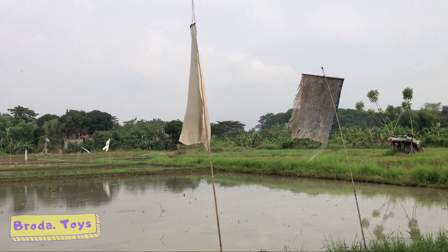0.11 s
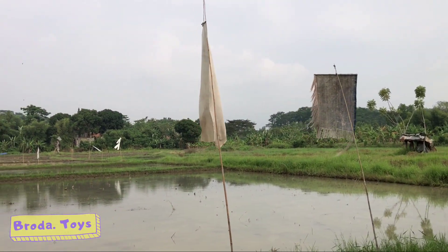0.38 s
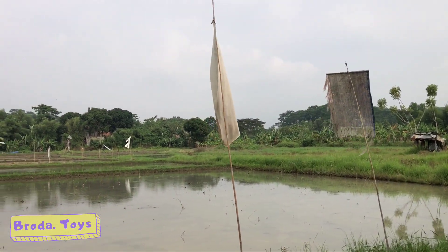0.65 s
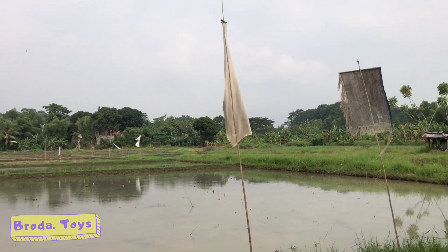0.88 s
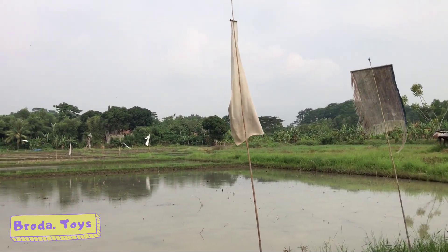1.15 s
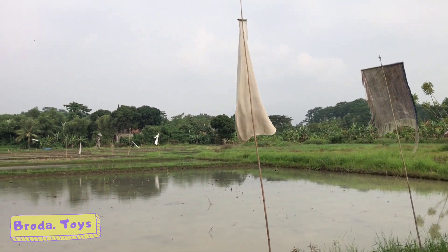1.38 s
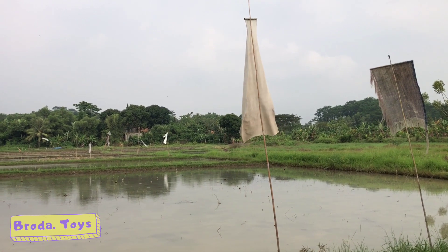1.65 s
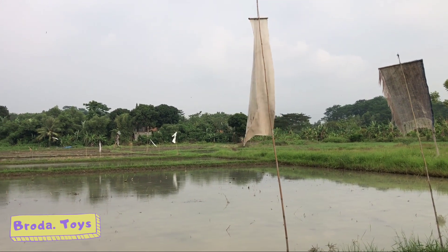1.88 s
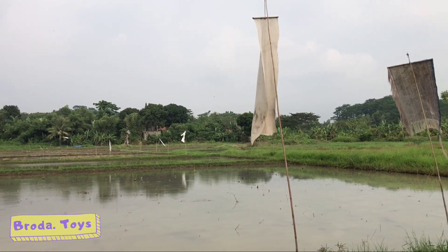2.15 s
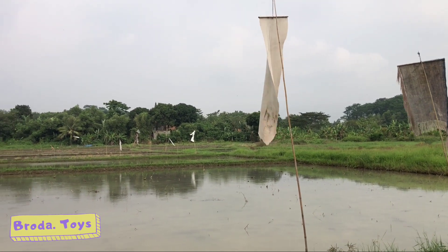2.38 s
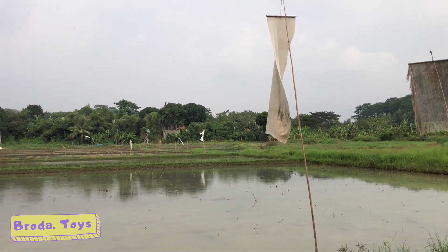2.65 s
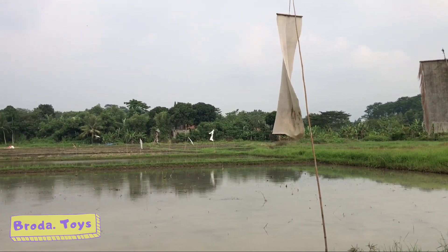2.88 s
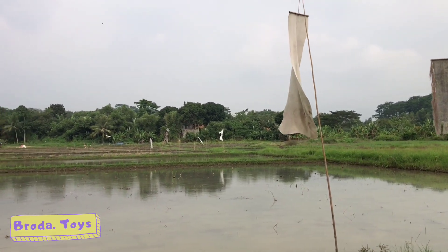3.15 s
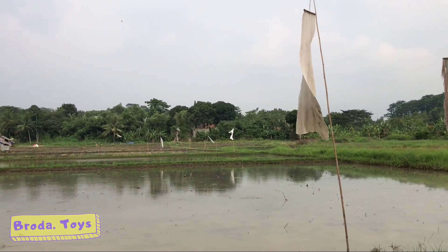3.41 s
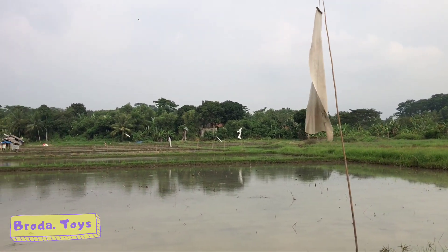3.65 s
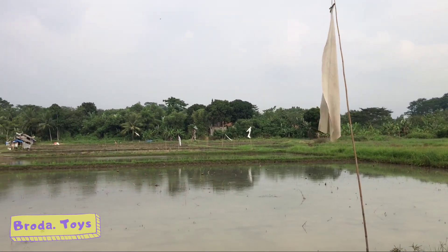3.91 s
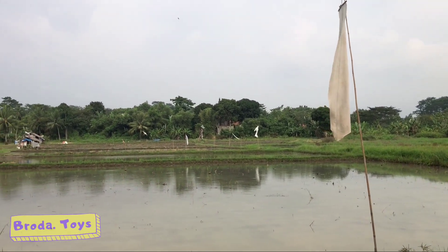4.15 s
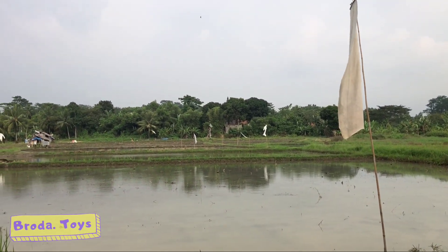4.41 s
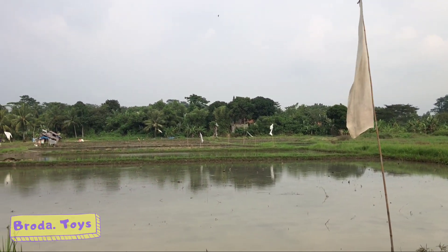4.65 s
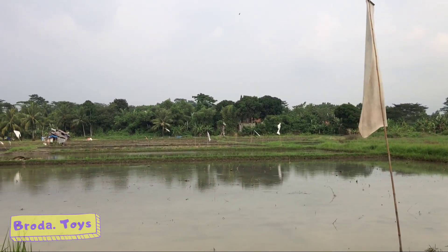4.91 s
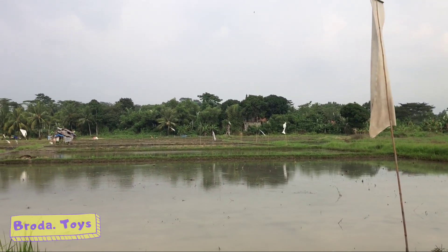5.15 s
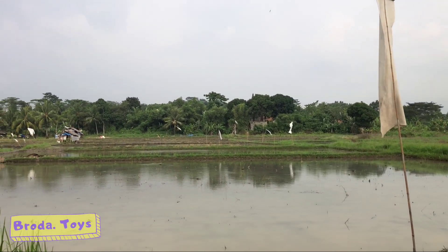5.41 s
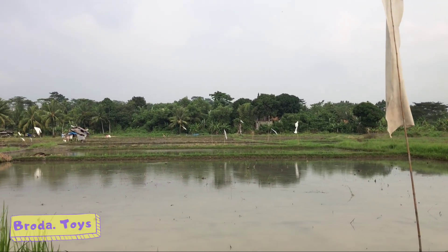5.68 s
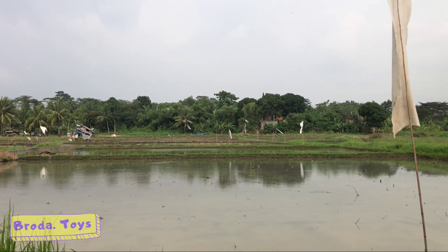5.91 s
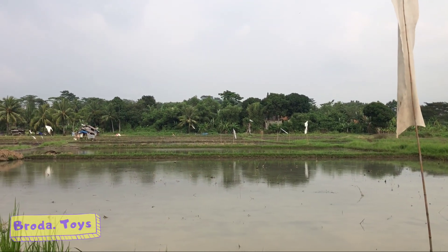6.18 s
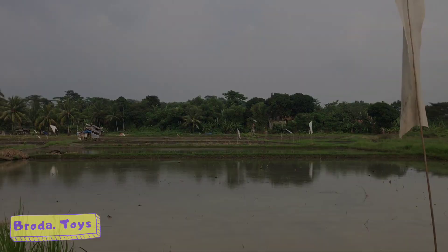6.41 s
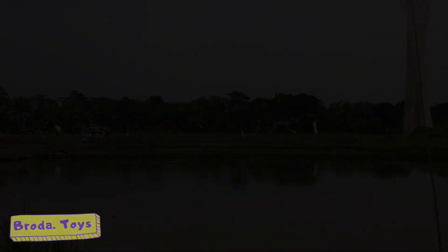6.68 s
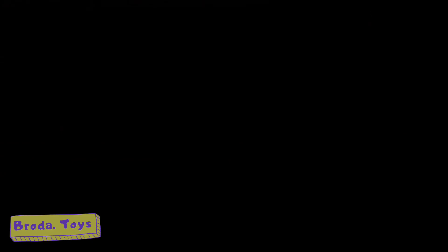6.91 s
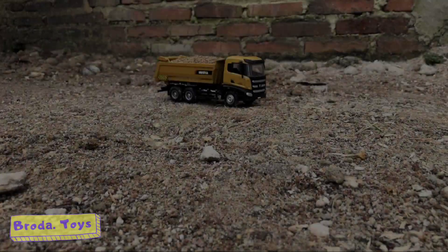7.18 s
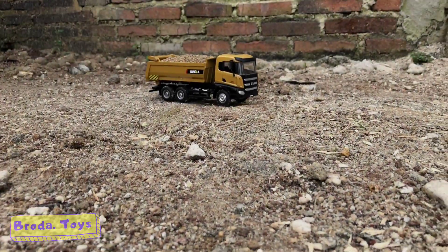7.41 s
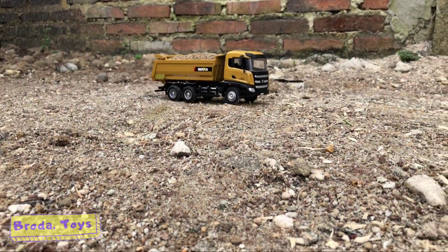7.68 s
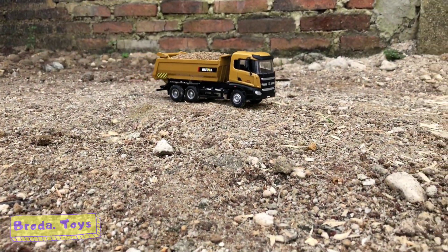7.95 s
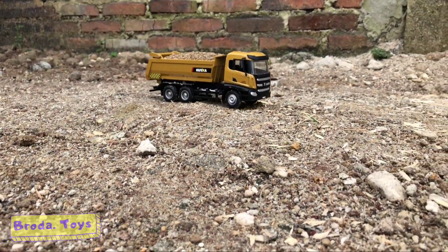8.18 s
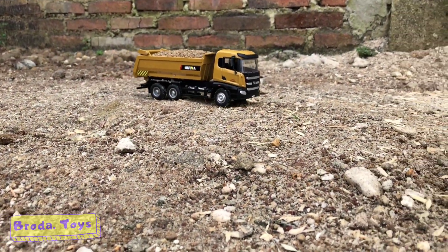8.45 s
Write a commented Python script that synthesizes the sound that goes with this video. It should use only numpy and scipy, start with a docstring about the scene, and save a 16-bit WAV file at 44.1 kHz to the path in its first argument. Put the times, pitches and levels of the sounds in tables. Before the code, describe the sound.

Songbirds whistle and chirp across open countryside for seven seconds, then abruptly a diesel truck's starter clunks, whines and grinds into a low idle.

```python
"""Songbirds whistle, trill and chirp near and far among trees over a faint hiss of open country: each note is a
gliding sine with an unsteady level, and the echoes are decaying noise convolved with the song. After seven
seconds the scene cuts to a diesel truck in the centre: the starter clunks in and whines, and its gears grind
and clank, all made from gear-tooth harmonics and resonated noise. The cylinders catch with deep thuds, pulses
ringing resonances, and then a darker idle of regular firings takes over abruptly, with one belt chirp."""
import sys
import numpy as np
from scipy import signal
from scipy.fft import rfft, irfft, next_fast_len
from scipy.io import wavfile
from scipy.ndimage import uniform_filter1d

SR = 44100
rng = np.random.default_rng(int(sys.argv[2]) if len(sys.argv) > 2 else 0)


def dump(signal):
    """Clip the signal to [-1, 1] and save it as 16-bit WAV at the path in sys.argv[1]."""
    limited = np.clip(np.atleast_2d(signal).T, -1, 1)
    pcm = np.round(limited * 32767).astype(np.int16)
    wavfile.write(sys.argv[1], SR, pcm)


def gain_from_db(level_db):
    """Turn a decibel level (scalar or array-like) into a linear amplitude factor."""
    decades = np.asarray(level_db, float) / 20
    return 10 ** decades


N = 377496
T = np.arange(N) / SR  # time in seconds
SLOW, QUICK = 120, 48  # smoothing of a note's level wobble, samples
SIDE_DB, SIDE_LAG_MS = 4, .43  # left minus right level, and left lead over right, for a perch of 1
EDGE_S = .008  # extra time at each end of a note for its fades
SOLENOID_S, CUT_S, IDLE_S = 7.021, 7.04, 8.07  # pinion thrown in, birdsong gone, cranking over


def level(x, db):
    """Root-mean-square scaling: bring a sound to a given rms level."""
    return x * gain_from_db(db) / np.sqrt(np.mean(x ** 2))


def curves(rows):
    """Linear interpolation: columns of a timed table as values per sample."""
    s, *columns = np.transpose(rows)
    return [np.interp(T, s, c) for c in columns]


def colour(x, points):
    """Spectral shaping: weight a sound by (Hz, dB) points joined on a log frequency axis."""
    hz, db = np.transpose(points)
    size = next_fast_len(N)
    f = np.maximum(np.fft.rfftfreq(size, 1 / SR), 1)
    gain = gain_from_db(np.interp(np.log(f), np.log(hz), db))
    return irfft(rfft(x, size) * gain, size)[..., :N]


def ring(x, modes):
    """Modal superposition: sum of resonances, neighbours in opposite phase."""
    total = 0
    for k, (hz, width, db) in enumerate(modes):
        b, a = signal.iirpeak(hz, hz / width, SR)
        total = total + (-1) ** k * gain_from_db(db) * signal.lfilter(b, a, x)
    return total


def walk(rate):
    """Band-limited fluctuation: random levels held 1 / rate s and slewed twice; spread near 1."""
    k = int(SR / rate)
    held = np.repeat(rng.standard_normal(N // k + 1), k)
    return 1.3 * uniform_filter1d(uniform_filter1d(held, k), k)[:N]


def gate(start, end, fade):
    """Linear envelope: 1 between two times, with straight fades inside them."""
    return np.clip(np.minimum(T - start, end - T) / fade, 0, 1)


def sing(rows, pan_db, lead_ms, rough_db, smooth, flutter=0, swing_hz=0):
    """Frequency modulation: a near-pure syrinx note, louder and sooner in the channel on its side."""
    s, hz, db = np.transpose(rows)
    span = slice(max(int((s[0] - EDGE_S) * SR), 0), int((s[-1] + EDGE_S) * SR))
    t = T[span]
    shake = uniform_filter1d(uniform_filter1d(rng.standard_normal(len(t)), smooth), smooth)
    shake *= np.sqrt(2.2 * smooth)  # restores a spread near 1
    shape = np.sin(np.pi / 2 * np.clip(np.minimum(t - t[0], t[-1] - t) / (2 * EDGE_S), 0, 1)) ** 2
    swing = swing_hz * np.sin(2 * np.pi * flutter * (t - s[0])) * np.clip((t - s[0]) / 0.038, 0, 1)
    pitch = np.interp(t, s, hz) + swing
    side = np.array([[.5], [-.5]])
    lead = side * lead_ms / 1000
    tone = np.sin(2 * np.pi * (np.cumsum(pitch) / SR + pitch * lead + rng.random()))
    loudness = gain_from_db(np.interp(t, s, db) + rough_db * shake + side * pan_db)
    return span, np.sqrt(2) * loudness * shape * tone


def call(s, length, first_hz, last_hz, db):
    """Swell and decay: a straight glide that peaks early and fades, as (s, Hz, dB) rows."""
    rise, swell_db_per_s, fade_db_per_s = 0.34, 250, 190.5  # rise is a share of the length
    return [(s, first_hz, db - swell_db_per_s * rise * length),
            (s + rise * length, first_hz + rise * (last_hz - first_hz), db),
            (s + length, last_hz, db - fade_db_per_s * (1 - rise) * length)]


# Near whistles. Each row: perch (1 left, 0 ahead, -1 right), then a list of points, each: time in seconds,
# pitch in Hz, level of the direct sound in dB.
WHISTLE_NOTES = [(1, [(0.028, 1680, -29), (0.05, 1765, -26.5), (0.07, 1856, -41), (0.102, 1870, -36),
                 (0.146, 1781, -49), (0.16, 1828, -34), (0.186, 1630, -34.5), (0.205, 1570, -57)]),
                 (-1.24, [(0.34, 3390, -48), (0.38, 3624, -35), (0.428, 3570, -41), (0.436, 3500, -26.5),
                 (0.454, 3320, -35), (0.47, 3400, -40)]), (-0.93, [(2.345, 7870, -44), (2.371, 8000, -52),
                 (2.403, 7650, -45), (2.44, 7500, -60)]), (-0.89, [(2.5, 7860, -57), (2.536, 7860, -43.5),
                 (2.56, 7820, -51), (2.62, 7205, -50)]), (-1.06, [(2.8, 3900, -48), (2.814, 3986, -34.5),
                 (2.902, 3906, -51), (2.94, 4050, -48)]), (-0.046, [(4.765, 1467, -47), (4.781, 1517, -54),
                 (4.867, 1558, -57), (4.915, 1513, -46), (4.945, 1470, -53)]),
                 (-0.79, [(5.675, 2380, -37.5), (5.699, 2903, -40.5), (5.731, 3127, -36),
                 (5.799, 3155, -50), (5.829, 3209, -45), (5.847, 3120, -38), (5.875, 2890, -42.5)]),
                 (0, [(5.7, 1448, -45), (5.764, 1553, -64), (5.826, 1614, -38), (5.87, 1504, -43.5),
                 (5.878, 1620, -46), (5.92, 1640, -54)]), (1, [(6.685, 3500, -39), (6.699, 3780, -42),
                 (6.727, 3837, -38), (6.789, 3610, -43), (6.82, 3830, -39)]), (0.95, [(0.055, 2516, -47),
                 (0.109, 2630, -31.5), (0.145, 2596, -30), (0.183, 2960, -25), (0.205, 2560, -24.5),
                 (0.247, 2393, -26.5), (0.273, 2362, -33), (0.32, 2385, -37)]), (1, [(0.327, 2128, -22),
                 (0.339, 2065, -20.5), (0.401, 1898, -21.5), (0.421, 1900, -20.5), (0.457, 2026, -17.5),
                 (0.475, 2220, -22)]), (0.98, [(1.074, 1750, -33), (1.088, 1771, -26), (1.204, 1858, -30),
                 (1.214, 1815, -38), (1.234, 1746, -23.5), (1.245, 1710, -38)]), (1, [(1.315, 2656, -23.5),
                 (1.331, 2600, -20.5), (1.353, 2581, -18), (1.403, 2585, -39), (1.41, 2500, -34)]),
                 (1, [(1.425, 2493, -28), (1.439, 2570, -19), (1.463, 2444, -12), (1.487, 2340, -33.5),
                 (1.505, 2290, -20), (1.555, 2114, -15), (1.589, 2083, -15), (1.61, 2095, -28)]),
                 (0.84, [(1.812, 2460, -19), (1.83, 2514, -15), (1.874, 2580, -36), (1.908, 2460, -32)]),
                 (1, [(1.864, 2821, -23), (1.888, 2819, -39), (1.894, 2894, -28), (1.94, 2916, -17.5),
                 (1.99, 2830, -38), (1.996, 2827, -24), (2.005, 2930, -25)]), (0.95, [(2.375, 3850, -31),
                 (2.389, 3713, -24.5), (2.463, 3770, -32), (2.474, 3830, -43)]), (0.94, [(2.403, 2936, -31),
                 (2.421, 3021, -22), (2.469, 2965, -22.5), (2.487, 2972, -48), (2.542, 3000, -34)]),
                 (-0.75, [(5.029, 2844, -28), (5.037, 2800, -22.5), (5.049, 2579, -32), (5.057, 2562, -25),
                 (5.079, 2558, -23), (5.088, 2550, -27)]), (-1, [(5.244, 2066, -30.5), (5.278, 2181, -27),
                 (5.312, 2143, -20.5), (5.418, 2206, -29.5), (5.426, 2170, -39), (5.44, 2136, -20.5),
                 (5.492, 2038, -29.5), (5.505, 1990, -37)]), (0.97, [(5.867, 2300, -27.5),
                 (5.883, 2293, -25), (5.939, 2130, -15.5), (5.966, 2171, -32.5)]),
                 (-0.92, [(5.982, 2784, -22.5), (5.994, 2800, -27), (6.012, 2526, -17), (6.04, 2500, -19),
                 (6.05, 2350, -31)]), (0.99, [(6.102, 2035, -26.5), (6.13, 2036, -19.5),
                 (6.178, 2127, -16.5), (6.188, 1944, -24), (6.198, 1953, -22.5)]),
                 (1, [(6.198, 1860, -27.5), (6.216, 1618, -31), (6.266, 1528, -33), (6.286, 1637, -24),
                 (6.316, 1790, -21.5), (6.334, 1720, -31)]), (-1.18, [(6.215, 2060, -30),
                 (6.241, 2110, -23), (6.259, 2066, -16), (6.317, 2067, -15.5), (6.331, 2115, -16),
                 (6.387, 2126, -17.5), (6.441, 2054, -19), (6.481, 2084, -26)]), (0.97, [(6.468, 2490, -34),
                 (6.474, 2480, -24), (6.508, 2690, -28), (6.535, 2640, -30)]), (0.86, [(6.573, 2502, -19),
                 (6.587, 2514, -10.5), (6.605, 2310, -32), (6.625, 2254, -17), (6.645, 2240, -14),
                 (6.721, 2208, -36)])]


def whistles(near):
    """Direct sound: near whistles follow their pitch and level contours."""
    for side, rows in WHISTLE_NOTES:
        span, note = sing(rows, SIDE_DB * side, SIDE_LAG_MS * side, 1.2, SLOW)
        near[:, span] += note


# Near trills. Each row: left minus right in dB, flutters per second, pitch swing in Hz, then a list of points,
# each: time in seconds, middle pitch in Hz, level of the direct sound in dB.
TRILL_NOTES = [(2, 61, 158, [(.545, 2276, -29), (.565, 2210, -20), (.61, 2158, -23.5), (.67, 2120, -27.5),
               (.685, 2220, -25)]), (-6, 41, 470, [(4.93, 1985, -62), (4.955, 2150, -41.5),
               (4.985, 2100, -43), (5.01, 2250, -41)]), (-1, 33, 220, [(5.87, 1650, -40), (5.95, 1740, -34),
               (6.0, 2260, -40)]), (4.5, 75, 150, [(6.9, 2450, -37), (6.95, 2600, -27), (7.0, 2568, -25),
               (7.032, 2515, -25)]), (-1, 150, 1100, [(3.0, 3380, -48), (3.04, 3410, -41.5),
               (3.06, 3340, -48)])]


def trills(near):
    """Vibrato: a fast sinusoidal swing of pitch makes a trill."""
    for pan_db, flutter, swing_hz, rows in TRILL_NOTES:
        span, note = sing(rows, pan_db, SIDE_LAG_MS * np.sign(pan_db), 1.5, SLOW, flutter, swing_hz)
        near[:, span] += note


# Short calls. Each row: perch (1 left, 0 ahead, -1 right), then a list of calls, each: start in seconds,
# length in seconds, first pitch in Hz, last pitch in Hz, peak level in dB ahead of any scattering.
CHIRP_CALLS = [(0.94, [(.79, 0.031, 3000, 3770, -41), (.85, .029, 2860, 3580, -35.5),
               (.88, 0.012, 3510, 2820, -34.5), (.914, 0.04, 3540, 3380, -32),
               (.914, 0.022, 3020, 3970, -33), (.94, .022, 3800, 2695, -39.5), (1.0, .03, 1970, 2550, -45),
               (1.0, 0.054, 4580, 4550, -49), (1.09, .025, 3900, 3120, -39),
               (1.545, 0.076, 4780, 3670, -42.5), (1.65, 0.02, 4200, 2440, -37.5),
               (1.75, 0.044, 1710, 1573, -40), (1.772, 0.035, 2130, 2210, -29.5),
               (1.964, 0.034, 2430, 2690, -30.5), (2.011, 0.027, 2520, 2380, -32.5),
               (2.123, 0.032, 5900, 6050, -40), (2.185, 0.041, 4710, 4584, -30),
               (2.22, 0.06, 5200, 7100, -42.5), (2.243, 0.022, 4650, 4470, -39.5),
               (2.26, .09, 5930, 6250, -44), (2.305, 0.028, 2650, 2190, -37.5),
               (3.305, .055, 4890, 3840, -46.5), (4.43, .07, 4900, 5030, -51), (5.38, .04, 5000, 3800, -44),
               (2.36, .02, 4500, 3860, -40), (3.36, .06, 3830, 3660, -46.5),
               (3.49, 0.13, 4220, 4200, -49.5), (3.73, 0.059, 4200, 4260, -49.5),
               (4.22, .097, 3900, 5200, -46), (4.39, 0.051, 3860, 4920, -44),
               (4.57, 0.062, 4800, 4870, -44), (4.67, 0.028, 3390, 3436, -36.5),
               (4.722, .069, 3700, 3430, -47), (4.777, 0.086, 4800, 4866, -45),
               (5.0, 0.069, 4280, 4470, -44), (5.38, 0.03, 4960, 5080, -37.5),
               (5.476, .05, 5180, 4960, -37), (5.64, 0.09, 4540, 4300, -43), (5.66, 0.028, 6300, 5420, -44),
               (5.671, .052, 5400, 5500, -46), (5.783, 0.071, 4410, 4400, -40),
               (5.819, 0.038, 7180, 7260, -45), (5.939, 0.06, 7200, 7580, -45),
               (5.955, 0.063, 3500, 4800, -36.5), (6.066, 0.052, 7180, 7120, -40.5),
               (6.5, 0.019, 3680, 3430, -33.5), (6.52, 0.07, 2740, 2870, -30),
               (6.42, .065, 2150, 1877, -28), (6.84, 0.062, 1750, 2300, -39), (6.74, .07, 1750, 1870, -46),
               (6.93, 0.086, 2970, 2860, -33.5)]), (0.11, [(.007, 0.025, 4400, 3960, -47),
               (.11, 0.063, 3030, 3680, -36.5), (.59, 0.092, 3330, 3200, -47),
               (1.24, 0.13, 3950, 3900, -49), (1.6, 0.091, 4200, 4170, -48), (6.42, 0.049, 4200, 4200, -46),
               (.794, .05, 4180, 4340, -45.5), (.82, .025, 3700, 2800, -44.5), (.895, .02, 2900, 3530, -45),
               (.96, .03, 3900, 2900, -48), (1.13, 0.028, 4200, 3250, -44.5), (1.17, .03, 3300, 4040, -56),
               (5.82, 0.047, 4100, 3440, -44.5), (3.89, .04, 4900, 4100, -49), (4.31, .06, 5300, 5300, -52),
               (4.5, .06, 5250, 5300, -53), (1.02, 0.029, 2630, 2207, -41.5), (1.04, 0.12, 7400, 7100, -49),
               (1.067, 0.027, 2610, 3300, -43), (1.12, 0.027, 3200, 4070, -51),
               (1.15, .031, 4100, 3680, -59), (1.27, 0.062, 3070, 3330, -46),
               (2.1, .028, 5300, 5940, -41.5), (3.1, 0.09, 4110, 4080, -45),
               (4.0, 0.056, 5190, 4170, -43.5), (4.02, 0.024, 6020, 5000, -45),
               (4.297, .03, 3110, 2920, -52), (4.63, .05, 4750, 3900, -51), (4.919, 0.065, 3700, 3520, -47),
               (5.412, 0.055, 3700, 3380, -39.5), (5.915, 0.046, 1720, 1780, -43),
               (6.005, 0.023, 3020, 3200, -32), (6.303, 0.05, 3200, 2954, -39),
               (6.38, 0.033, 4680, 3490, -45), (6.814, 0.043, 4140, 5230, -49), (6.9, 0.1, 8600, 7950, -41),
               (6.948, 0.11, 4110, 4230, -43)]), (-0.96, [(.2, 0.042, 2940, 2866, -37),
               (.451, 0.062, 3550, 3050, -42), (.459, .045, 1926, 1970, -33), (.53, 0.071, 3350, 3340, -41),
               (.523, 0.064, 4230, 4220, -40), (.97, .032, 3900, 3300, -56), (1.04, 0.024, 3200, 4150, -44),
               (1.245, 0.012, 4900, 4020, -45), (1.95, 0.055, 1587, 1600, -50),
               (2.179, 0.09, 7980, 8200, -40), (2.225, .062, 7580, 7620, -48),
               (2.72, 0.18, 8030, 7160, -48), (2.92, .12, 2280, 2560, -52), (3.2, 0.032, 3800, 4400, -47),
               (3.87, 0.046, 5220, 4040, -46), (4.04, 0.034, 4640, 4000, -55),
               (4.6, 0.066, 4460, 3420, -44), (4.949, 0.058, 2040, 2144, -40.5),
               (5.196, 0.056, 2590, 2550, -39.5), (5.24, 0.027, 2490, 2300, -32),
               (5.26, 0.031, 3110, 2800, -40), (5.335, .033, 2900, 2580, -39),
               (5.34, .036, 5760, 5200, -45), (5.365, 0.027, 2710, 5100, -44),
               (5.5, 0.061, 4630, 4540, -44), (5.507, 0.077, 4850, 4870, -49),
               (5.555, 0.032, 2200, 2080, -44), (5.7, .019, 5480, 6240, -41),
               (5.707, 0.13, 2420, 2386, -43), (5.767, .104, 3940, 4160, -39),
               (5.811, .07, 7000, 7080, -46.5), (5.85, .018, 6960, 5400, -51),
               (5.978, .022, 7340, 5500, -53), (6.006, .05, 4700, 4480, -41.5),
               (6.05, 0.048, 4700, 4710, -48), (6.096, 0.022, 7070, 5130, -48.5),
               (6.138, 0.078, 3534, 4800, -38), (6.194, .08, 4450, 4250, -45.5),
               (6.228, 0.019, 2404, 2610, -23), (6.334, 0.098, 2920, 2780, -35.5),
               (6.575, 0.024, 4770, 3920, -43), (6.64, 0.036, 3390, 3200, -37),
               (6.8, 0.043, 3590, 5650, -43), (6.916, 0.078, 6650, 6690, -41),
               (6.96, 0.062, 6770, 6100, -41.5)])]


def chirps(near, far):
    """Linear chirps: loud calls are near; among far ones only short fast sweeps are scratchy."""
    far_below_db, steady_hz_per_s, long_s = -33, 5000, .062
    for side, rows in CHIRP_CALLS:
        for s, length, first_hz, last_hz, db in rows:
            close = db > far_below_db
            slow_glide = abs(last_hz - first_hz) < steady_hz_per_s * length
            pure = close or length > long_s or slow_glide
            rough_db, smooth = (2.5, SLOW) if pure else (4, QUICK)
            glide = call(s, length, first_hz, last_hz, db)
            span, note = sing(glide, SIDE_DB * side, SIDE_LAG_MS * side, rough_db, smooth)
            (near if close else far)[:, span] += note


def ticks(far):
    """Periodic repetition: seven high ticks at 17 per second, each lower than the last."""
    for k in range(7):
        hz = 7420 - k * 39.6
        span, note = sing(call(4.175 + k / 17, .022, hz, hz - 180, -51.5), 0, 0, 4.0, QUICK)
        far[:, span] += note


# Swell of the distant chorus. Each row: time in seconds, gain in dB.
CHORUS_SWELL = [(0, -34), (.9, 0), (1.5, 6), (2.3, 0.5), (3, -7), (3.7, -7), (4.4, -1.5), (5, 5), (5.5, 6),
                (6, 10.5), (6.5, 4), (7, 10.5)]


def chorus():
    """Incoherent summation: many small birds beyond the nearest trees blur into a haze."""
    haze = np.zeros((2, N))
    for when, first, glide, size, place in rng.random((260, 5)):
        s, hz, db = .02 + 6.9 * when, 2300 + 2900 * first, -54 - 9 * size
        rows = [(s, hz, db), (s + .045, hz * (.8 + .4 * glide), db)]
        span, note = sing(rows, 12 * place - 6, 0, 4.5, QUICK)
        haze[:, span] += note
    return haze * gain_from_db(curves(CHORUS_SWELL)[0])


def trees(x, t60, gap):
    """Diffuse scattering: trunks and leaves spread song into a fading tail, unrelated left and right."""
    t = np.arange(SR) / SR
    decay = np.exp(-np.log(1000) * t / t60)
    tail = rng.standard_normal((2, SR)) * decay * np.clip(t / gap, 0, 1)  # gap: fade-in in s
    tail /= np.sqrt(np.sum(tail ** 2, axis=1, keepdims=True))
    return signal.fftconvolve(x, tail, axes=1)[:, :N]


def birds():
    """Direct-to-reverberant ratio: near song is clear, faint calls come from further off, full of echo."""
    near, far = np.zeros((2, 2, N))
    whistles(near)
    trills(near)
    chirps(near, far)
    ticks(far)
    haze = chorus()
    # leaves on the way scatter far song into many close arrivals, which blurs its lines
    leaves_t60_s, trees_t60_s = .12, 0.91
    far = gain_from_db(-2) * far + gain_from_db(-3) * trees(far, leaves_t60_s, gap=.002)
    near += gain_from_db(-4.5) * trees(near, leaves_t60_s, gap=0.00063)
    echo = trees(gain_from_db(-11.5) * near + gain_from_db(-4.5) * far + haze, trees_t60_s, gap=0.012)
    # air and leaves take the treble out of the long tail
    echo = signal.sosfilt(signal.butter(1, 4000, fs=SR, output="sos"), echo)
    return near + far + gain_from_db(-11) * haze + echo


def teeth(rows, orders):
    """Gear-mesh harmonics: a gear pair sings at its tooth rate and multiples, each wavering."""
    hz, db = curves(rows)
    phase = 2 * np.pi * np.cumsum(hz * (1 + .018 * walk(60))) / SR
    tones = sum(gain_from_db(d + 4.5 * walk(40)) * np.sin(k * phase) for k, d in orders)
    return gain_from_db(db) * level(tones, 0)


# Starter whine, then the pinion's groan against the first compression. Each row: time in seconds,
# tooth rate in Hz, level in dB.
WHINE_RATE = [(7.02, 345, -38), (7.14, 395, -28), (7.17, 400, -53), (7.5, 320, -46), (7.57, 332, -31),
              (7.8, 422, -27), (7.92, 458, -28.5), (8.02, 466, -29), (8.08, 460, -42)]
GROAN_RATE = [(7.02, 521, -28), (7.05, 491.6, -27), (7.1, 510, -23.5), (7.15, 510, -36), (7.19, 553.7, -26),
              (7.225, 548, -23.5), (7.25, 517, -12), (7.275, 499, -17), (7.295, 481, -43)]
# Harmonics of each. Each row: multiple of the tooth rate, relative level in dB.
WHINE_HARMONICS = [(1, 0), (2, -5), (3, -25)]
GROAN_HARMONICS = [(.5, -8), (1, 4.5), (1.5, -10), (2, 3.5), (2.5, -26), (3, -8), (4, -8)]
# Resonances of the gear housing, the brushes, and the solenoid throwing the pinion in.
# Each row: frequency in Hz, width in Hz, relative gain in dB.
HOUSING_MODES = [(340, 15, -24), (557, 59, 3.5), (1030, 110, -2.5), (1254, 35, 4), (1530, 19, -2),
                 (1721, 18, 0), (1975, 136, -3), (2640, 29, -2.5), (3200, 400, -11), (4180, 28, -17),
                 (7260, 220, -30), (7700, 68, -32), (9150, 86, -25.5)]
BRUSH_MODES = [(3970, 36, 3), (4300, 52, 3), (4870, 31, -3), (5580, 55, -9), (5940, 110, -20),
               (7440, 170, -10), (7760, 150, -10), (8280, 140, -0.5), (9500, 93, -6)]
SOLENOID_MODES = [(188, 21, 3), (510, 30, -4), (764, 50, -1), (1210, 50, -8)]
# Spectra of the gear grind and the brush sizzle. Each row: frequency in Hz, relative density in dB per Hz.
GRIND_SPECTRUM = [(60, -29), (100, -7.5), (300, -3.5), (520, -4), (850, -0.5), (1600, -7.5), (2400, -9.5),
                  (4000, -15), (5500, -18.5), (9000, -26), (15500, -49)]
SIZZLE_SPECTRUM = [(1500, -30), (3000, -24), (4500, -3), (6000, -10), (9300, -2.5), (10500, -4.5),
                   (15500, -17.5)]
# Gear clanks. Each row: start in seconds, initial gain in dB, time to fall by 60 dB in seconds.
GEAR_CLANKS = [(7.02, -6.5, 0.26), (7.043, -26, 0.13), (7.203, -9, 0.28), (7.367, -2, 0.19),
               (7.389, -31, 0.11), (7.472, 2, 0.11), (7.493, -11.5, 0.07), (7.574, -9, 0.08),
               (7.589, -1, 0.11)]
# Starter effort. Each row: time in seconds, gain of the gear grind in dB before the dips at compressions.
GRIND_EFFORT = [(7.02, -28), (7.12, -22.5), (7.25, -23), (7.4, -24.5), (7.62, -26), (7.8, -25),
                (7.88, -21.5), (8.0, -22.5), (8.04, -36), (8.09, -32)]
# Compressions against which the starter labours. Each entry: centre of the dip in seconds.
COMPRESSION_TIMES = [7.155, 7.325, 7.445, 7.55]


def starter():
    """Forced and struck resonance: teeth whine and grind in the housing, slack in the drive clanks."""
    # the gears go quiet while the starter labours: a 6 dB dip, 0.031 s to its 1/e point
    grind_db = curves(GRIND_EFFORT)[0] - 6 * sum(np.exp(-((T - s) / 0.031) ** 2) for s in COMPRESSION_TIMES)
    grit = rng.standard_normal(N) * gain_from_db(1.8 * walk(200) + .8 * walk(40))
    grind = level(ring(grit, HOUSING_MODES), -2.4) + level(colour(grit, GRIND_SPECTRUM), -2.5)
    # the brushes sizzle on the commutator in a few narrow treble bands
    spit = rng.standard_normal(N) * gain_from_db(2.0 * walk(400))
    hiss = level(colour(spit, SIZZLE_SPECTRUM), -2) + level(ring(spit, BRUSH_MODES), -0.5)
    rattle = np.zeros(N)
    for s, db, t60 in GEAR_CLANKS:
        rattle += gain_from_db(db - 60 * (T - s).clip(0) / t60) * gate(s, s + 1, 0.0037)
    struck = level(ring(rng.standard_normal(N), HOUSING_MODES), -11.0)
    struck += level(colour(rng.standard_normal(N), GRIND_SPECTRUM), -15.5)
    running = gain_from_db(grind_db) * grind + gain_from_db(grind_db - 13) * level(hiss, 0)
    running += teeth(WHINE_RATE, WHINE_HARMONICS) + teeth(GROAN_RATE, GROAN_HARMONICS)
    blow = np.zeros(N)
    blow[int(SOLENOID_S * SR)] = gain_from_db(32.5)
    return running * gate(7.015, IDLE_S + 0.011, 0.0034) + rattle * struck + ring(blow, SOLENOID_MODES)


# First firings. Each row: time in seconds, relative exhaust thud in dB, relative manifold bark in dB.
FIRST_FIRINGS = [(7.688, -17.5, -24.5), (7.727, -17, -22), (7.738, -16, -15), (7.767, -14, -11.5),
                 (7.8, -18, -16.5), (7.83, -20, -15.5), (7.863, -12, -27), (7.887, -17, -39),
                 (7.913, -9, -44), (7.937, -17.5, -27), (7.96, -10.5, -26), (7.972, -9, -31),
                 (7.991, -16, -37), (8.009, -13, -14), (8.02, -10.5, -36), (8.035, -16, -24)]
# Resonances of the exhaust and the manifold. Each row: frequency in Hz, width in Hz, relative gain in dB.
EXHAUST_MODES = [(34.8, 23.5, 3), (63, 40, -1)]
MANIFOLD_MODES = [(155, 108, -2.5), (238, 56, -9.5)]


def catch():
    """Impulse response: first firings thud, bark and crack in the block over the shudder of cranking."""
    thuds, barks = np.zeros((2, N))
    for s, thud_db, bark_db in FIRST_FIRINGS:
        thuds[int(s * SR)], barks[int(s * SR)] = gain_from_db(thud_db), gain_from_db(bark_db)
    shudder = level(ring(rng.standard_normal(N), EXHAUST_MODES + MANIFOLD_MODES), 0)
    jolt = gain_from_db(-21.5 - 60 * (T - SOLENOID_S).clip(0) / 0.28)  # the pinion engages
    rock = gain_from_db(-20.5) * np.exp(-((T - 7.85) / 0.17) ** 2)  # the block rocks as the cylinders catch
    shudder *= gain_from_db(-37) + jolt + rock
    burn = signal.lfilter([1], [1, -np.exp(-1 / (0.012 * SR))], thuds)  # each firing decays over 12 ms
    crack = burn * level(colour(rng.standard_normal(N), GRIND_SPECTRUM), -13)
    blows = gain_from_db(48) * ring(thuds, EXHAUST_MODES) + gain_from_db(48) * ring(barks, MANIFOLD_MODES)
    return blows + crack + shudder * gate(7.015, IDLE_S + 0.022, .01)


def firings(hz, scatter_db, odd_db):
    """Pulse train: one pulse per firing, strong and weak in turn; also the phase between firings."""
    turns = np.cumsum(hz * (1 + .03 * walk(30))) / SR
    k = turns.astype(int)
    size = gain_from_db(scatter_db * rng.standard_normal(N // 100)[k] + odd_db * (k % 2))
    return size * np.diff(k, prepend=0), turns % 1


# Idling engine. Each row: time in seconds, mean firing rate in Hz, gain in dB.
IDLE_RATE = [(8.05, 31.12, -25), (8.3, 31.3, -23), (8.56, 29.6, -22.5)]
# Spectral weighting of the idle. Each row: frequency in Hz, relative density in dB per Hz.
IDLE_SPECTRUM = [(18, -51), (30, -16), (123, -5.5), (197, -6), (479, -12.5), (970, -11.5), (1110, -21.5),
                 (1330, -13), (3230, -28.5), (3780, -23.5), (4420, -33.5), (11000, -54.5), (15500, -80)]
# Resonances of the engine block. Each row: frequency in Hz, width in Hz, relative gain in dB.
BLOCK_MODES = [(135, 20, 1.5), (244, 45, -15), (974, 144, -1), (1270, 25, 4.5), (2300, 220, -14),
               (3660, 100, -15)]
# Belt chirp. The one row: centre in seconds, pitch in Hz, peak level in dB, time to the 1/e point in seconds.
BELT_CHIRP = (8.382, 3700, -24, .005)


def idle():
    """Periodic excitation: firings ring the block, their fourth multiple hums, noise swells once a firing."""
    hz, db = curves(IDLE_RATE)
    pulses, phase = firings(hz, scatter_db=2, odd_db=-3)
    puff = rng.standard_normal(N) * (1 + .25 * np.sin(2 * np.pi * phase))
    knock = colour(ring(pulses, BLOCK_MODES), IDLE_SPECTRUM)
    hum = gain_from_db(-3 + 2 * walk(20)) * np.sin(8 * np.pi * np.cumsum(hz * (1 + .012 * walk(15))) / SR)
    combustion = level(ring(puff, BLOCK_MODES), -7.5) + level(colour(puff, IDLE_SPECTRUM), -1.9)
    body = level(knock, -17) + hum + combustion
    when, chirp_hz, chirp_db, length = BELT_CHIRP
    belt = gain_from_db(chirp_db) * np.exp(-((T - when) / length) ** 2) * np.sin(2 * np.pi * chirp_hz * T)
    return gain_from_db(db) * body * gate(IDLE_S - .03, N, 0.0063) + belt


# Spectrum of the open-country hiss. Each row: frequency in Hz, relative density in dB per Hz.
AIR_SPECTRUM = [(15, -32.5), (25, -0.5), (183, -4.5), (537, -7), (648, -8), (1530, -14.5), (4040, -9),
                (4750, -17), (6380, -15), (10900, -18), (12500, -16.5), (13900, -19.5), (15500, -18.5)]


def air():
    """Diffuse field: smooth distant hiss from independent left and right noise, wavering slightly together."""
    return level(colour(rng.standard_normal((2, N)), AIR_SPECTRUM), -45) * gain_from_db(.6 * walk(3))


def scene():
    """Superposition in sequence: the countryside is cut off just after the truck comes in."""
    country = (birds() + air()) * gate(-1, CUT_S, 0.023)
    return country + starter() + catch() + idle()


def low_pass(x):
    """Removes everything above the highest recorded frequency."""
    return signal.sosfilt(signal.butter(12, 15800, fs=SR, output="sos"), x)


def record(dry):
    """Low-pass filtering: an elliptic filter cuts the top steeply above 15.6 kHz."""
    top = signal.ellip(10, .2, 80, 15600, fs=SR, output="sos")
    return low_pass(signal.sosfilt(top, dry))


dry = scene()
out = record(dry)
dump(out)
```